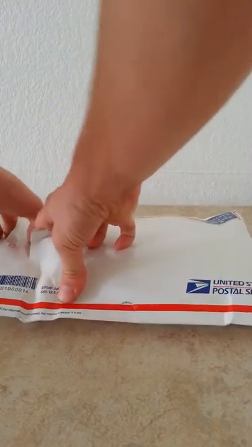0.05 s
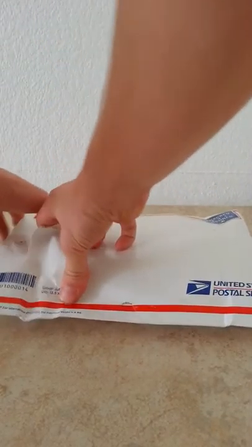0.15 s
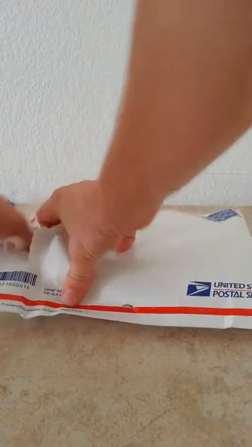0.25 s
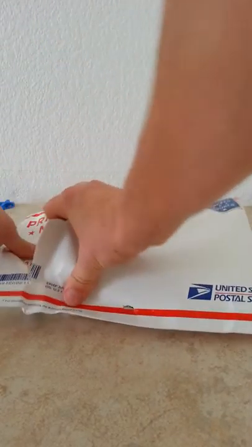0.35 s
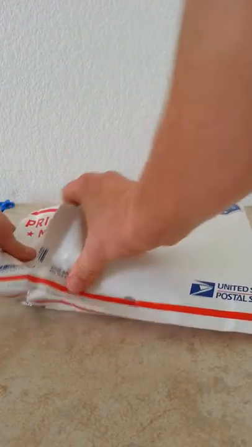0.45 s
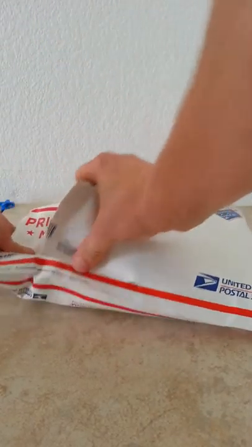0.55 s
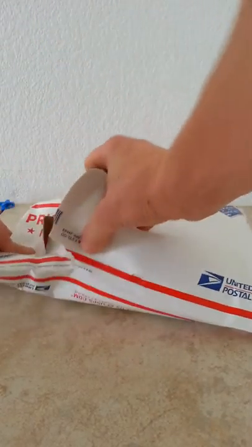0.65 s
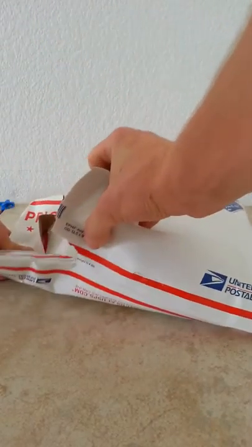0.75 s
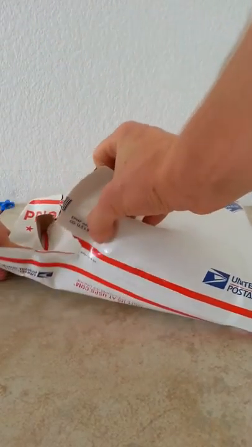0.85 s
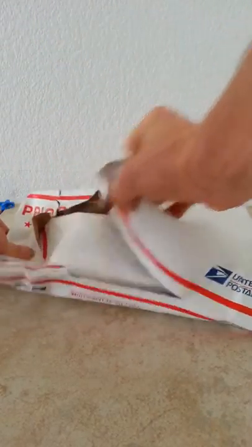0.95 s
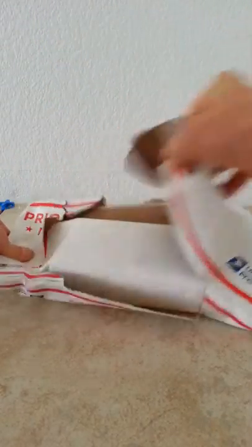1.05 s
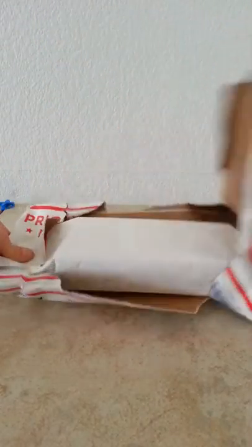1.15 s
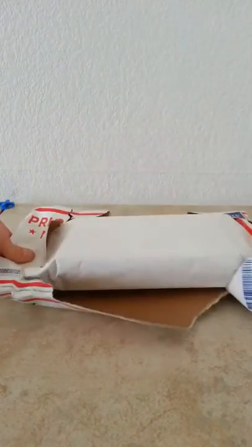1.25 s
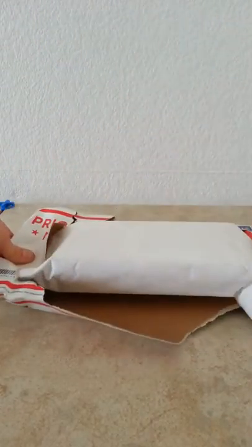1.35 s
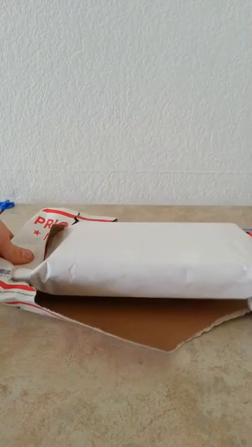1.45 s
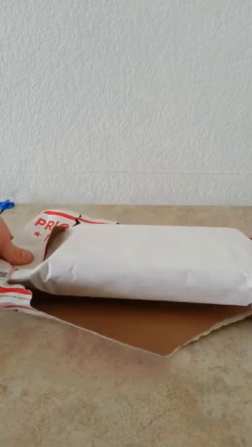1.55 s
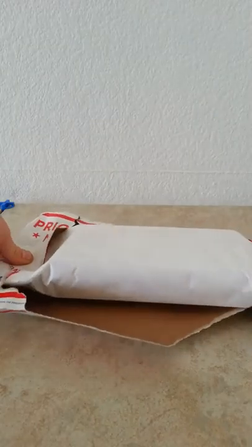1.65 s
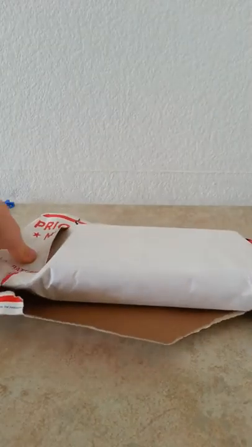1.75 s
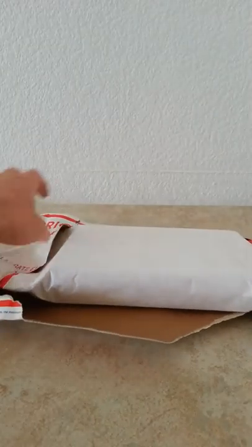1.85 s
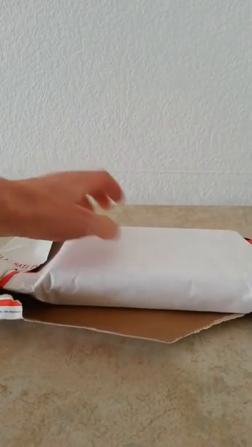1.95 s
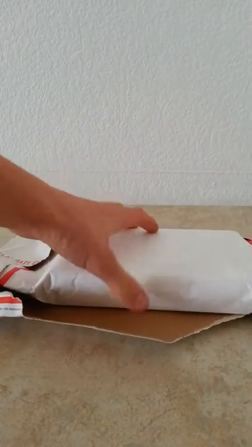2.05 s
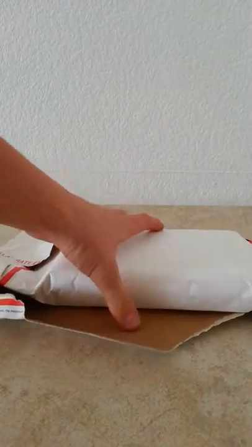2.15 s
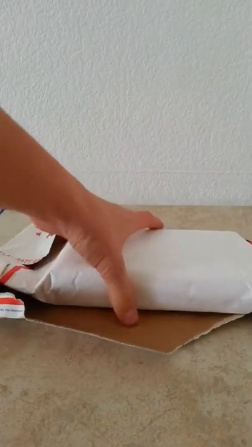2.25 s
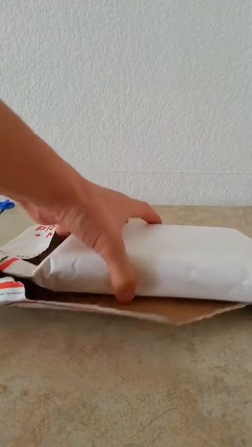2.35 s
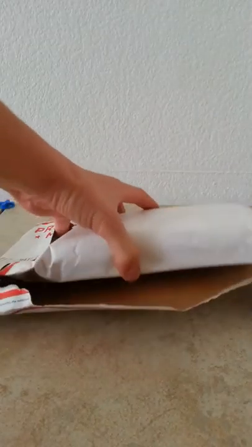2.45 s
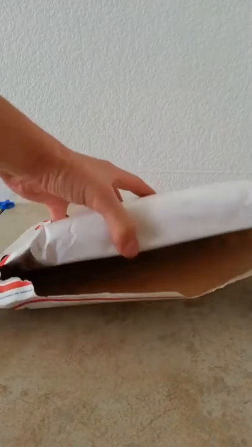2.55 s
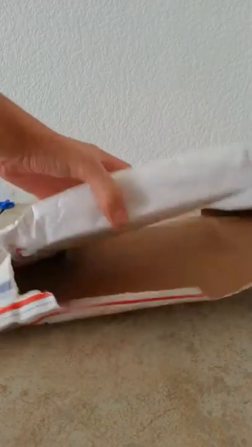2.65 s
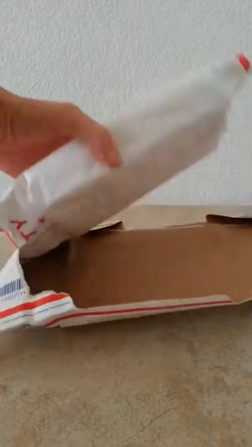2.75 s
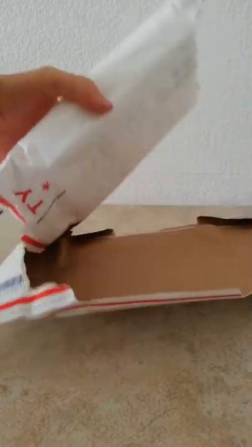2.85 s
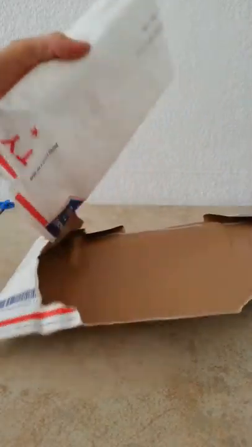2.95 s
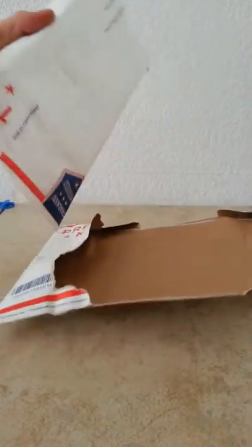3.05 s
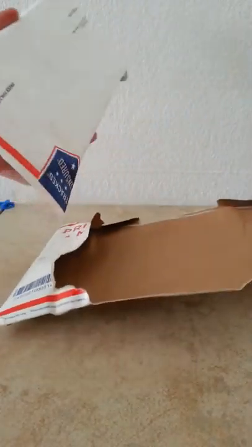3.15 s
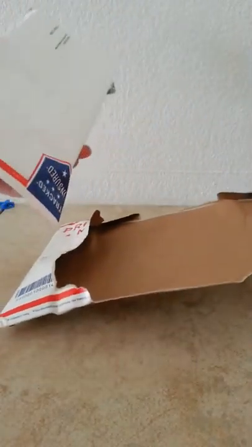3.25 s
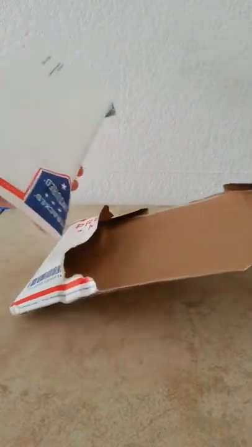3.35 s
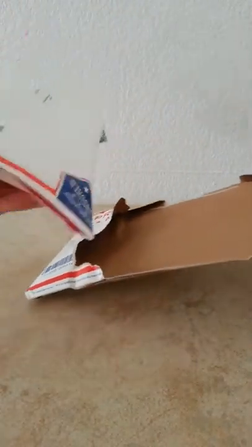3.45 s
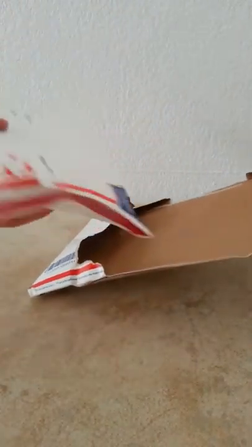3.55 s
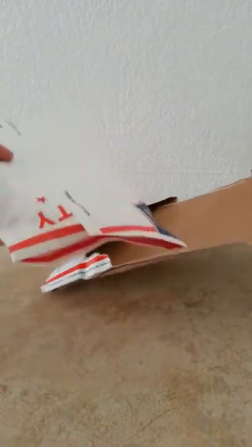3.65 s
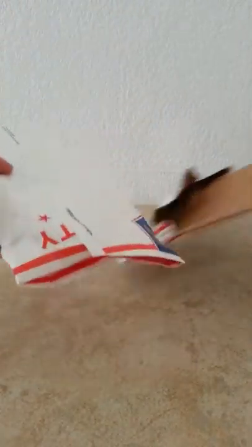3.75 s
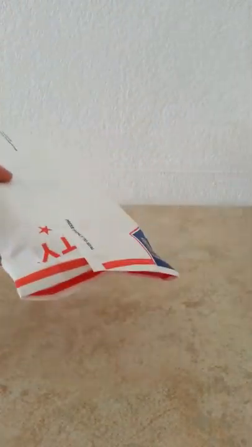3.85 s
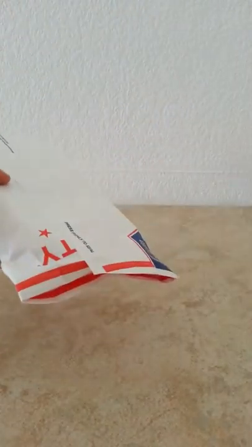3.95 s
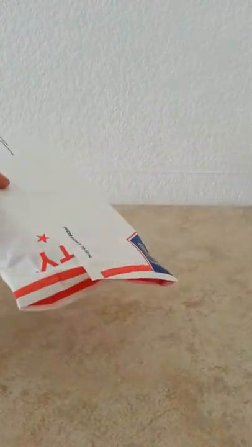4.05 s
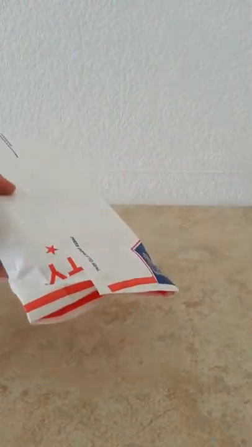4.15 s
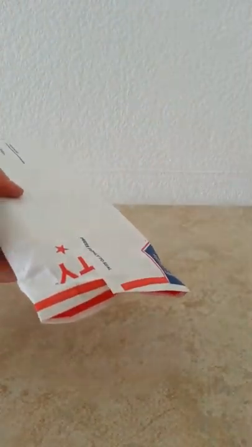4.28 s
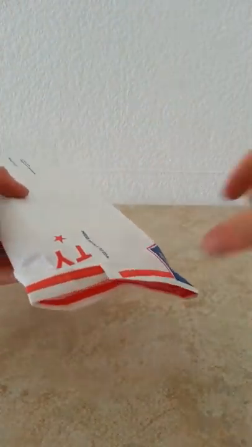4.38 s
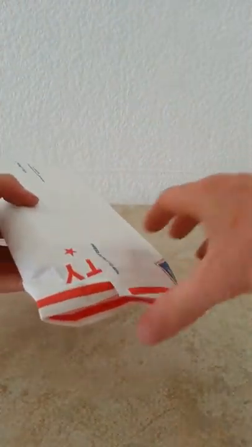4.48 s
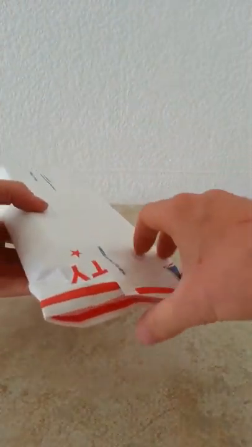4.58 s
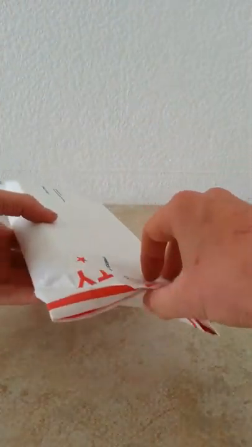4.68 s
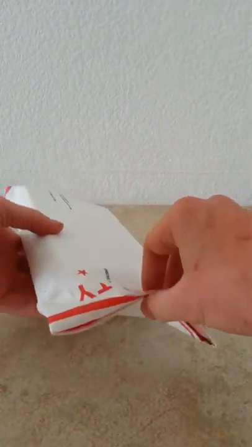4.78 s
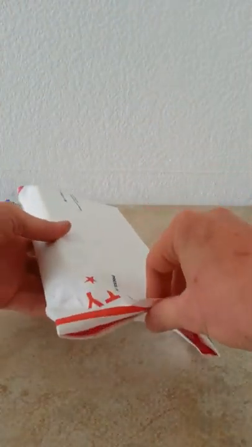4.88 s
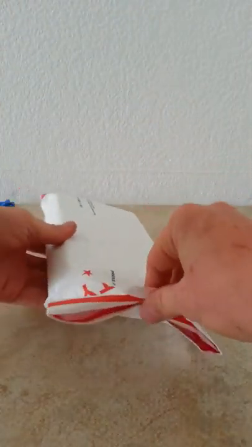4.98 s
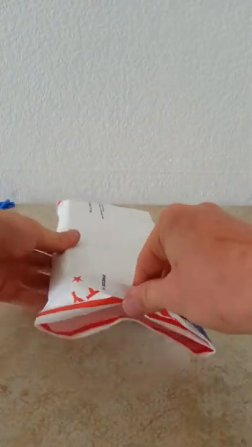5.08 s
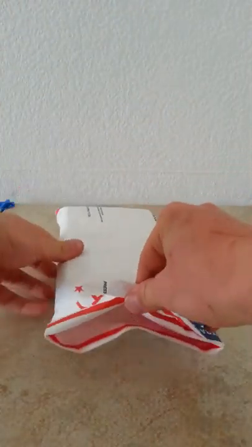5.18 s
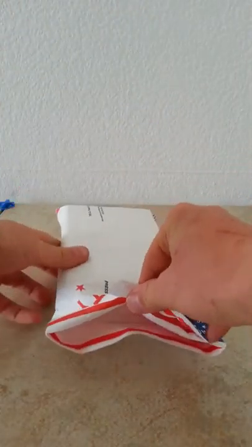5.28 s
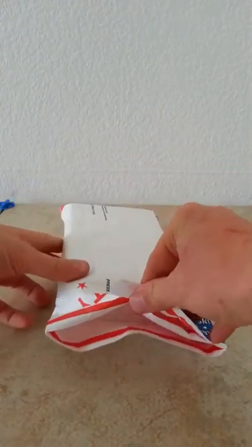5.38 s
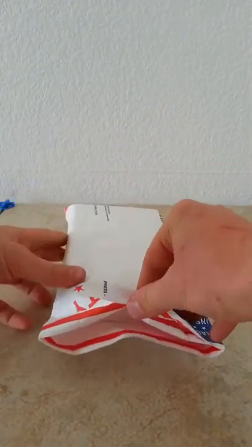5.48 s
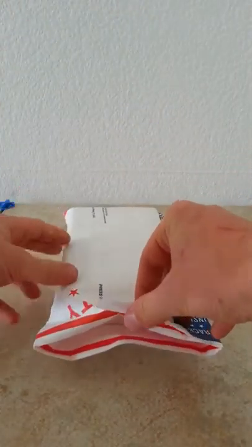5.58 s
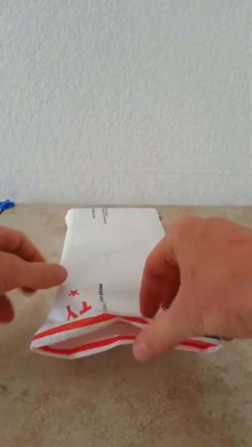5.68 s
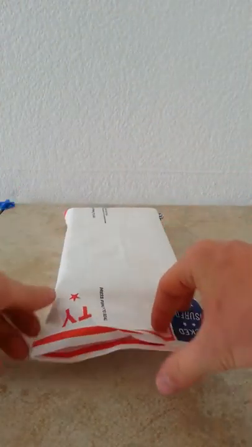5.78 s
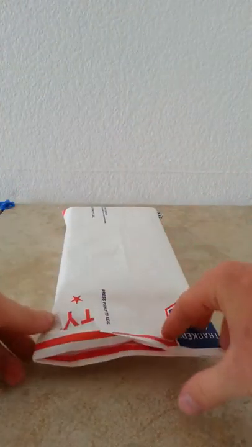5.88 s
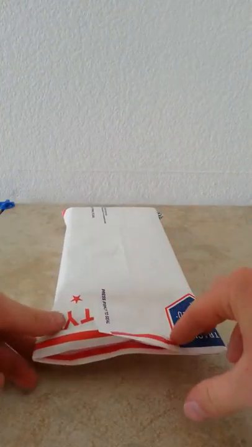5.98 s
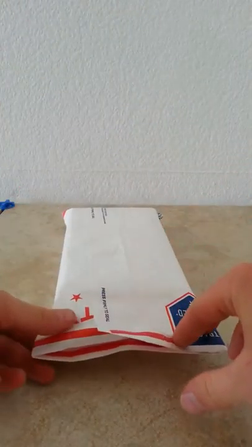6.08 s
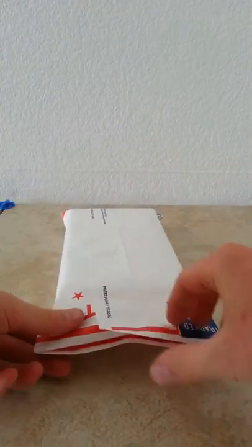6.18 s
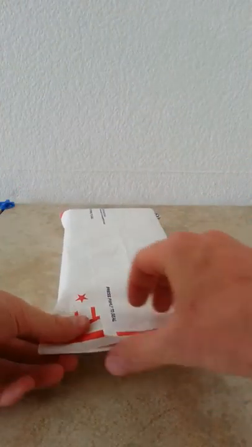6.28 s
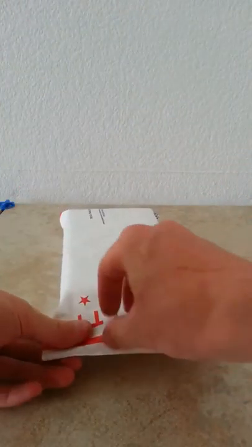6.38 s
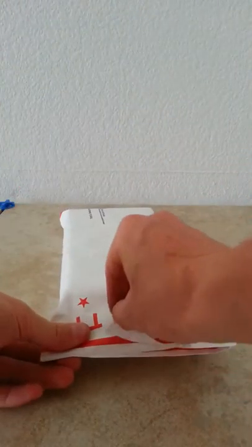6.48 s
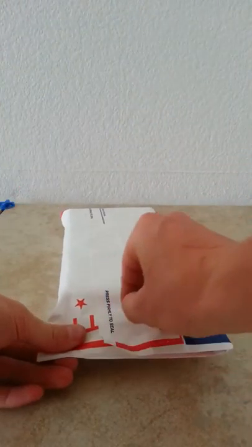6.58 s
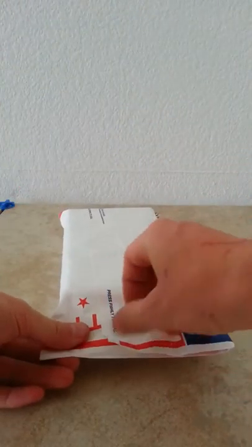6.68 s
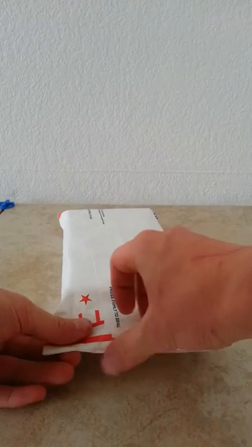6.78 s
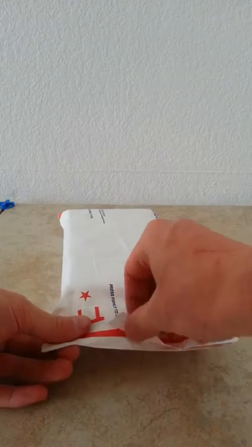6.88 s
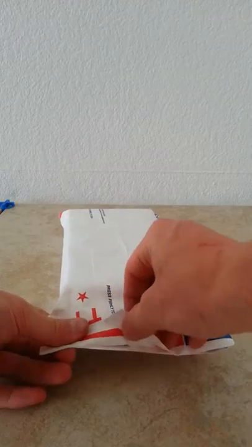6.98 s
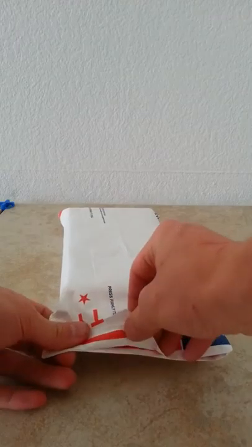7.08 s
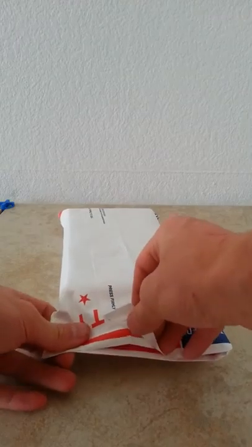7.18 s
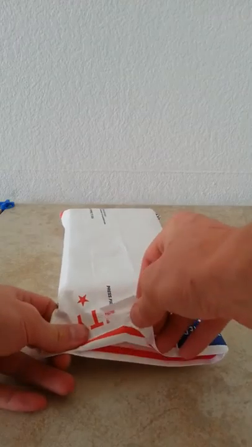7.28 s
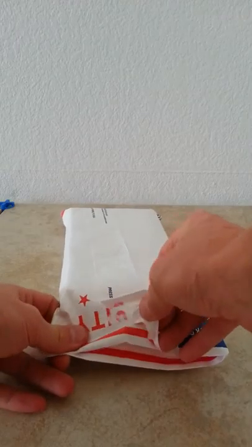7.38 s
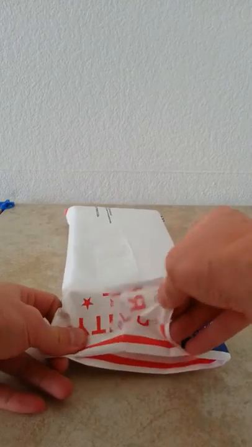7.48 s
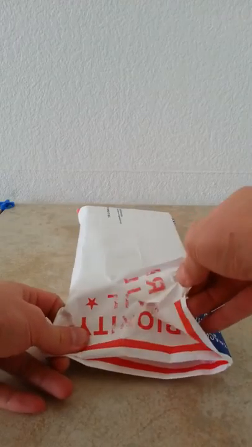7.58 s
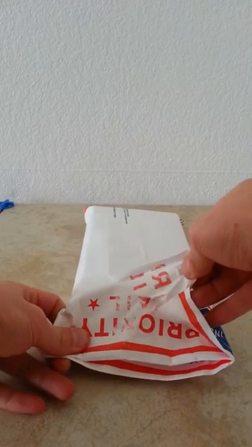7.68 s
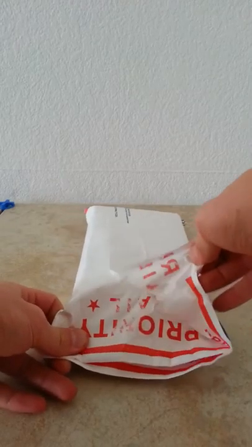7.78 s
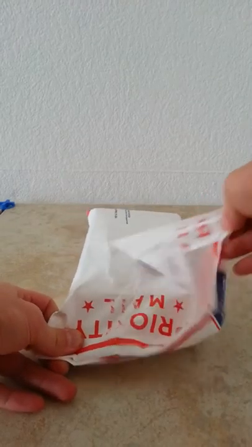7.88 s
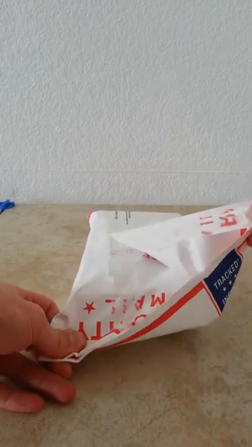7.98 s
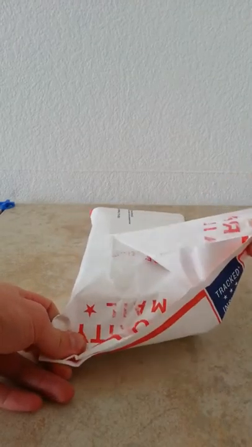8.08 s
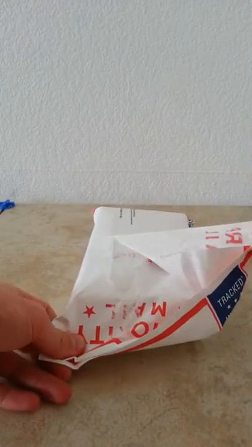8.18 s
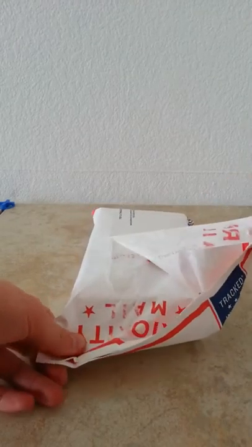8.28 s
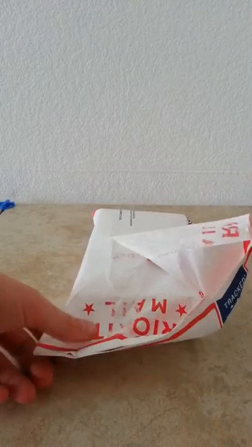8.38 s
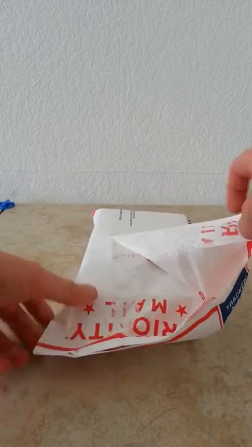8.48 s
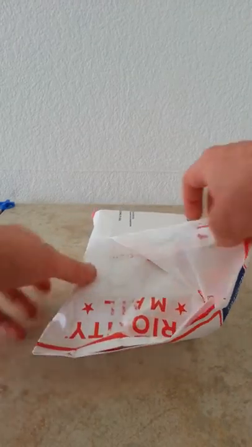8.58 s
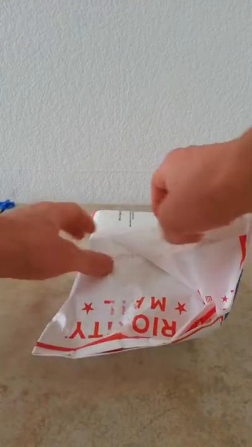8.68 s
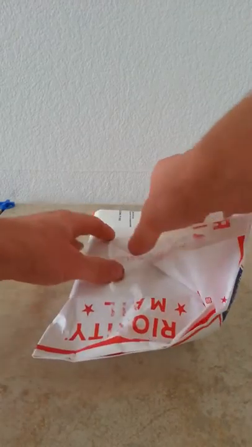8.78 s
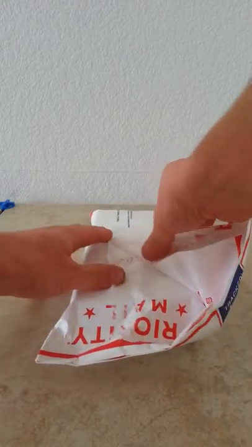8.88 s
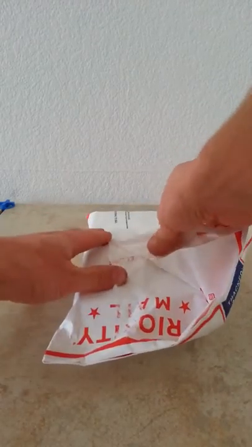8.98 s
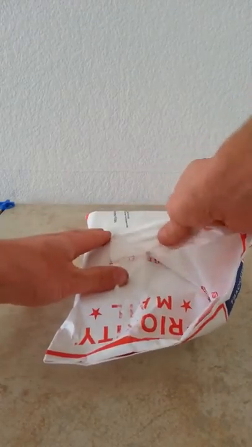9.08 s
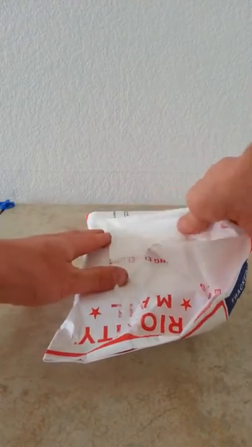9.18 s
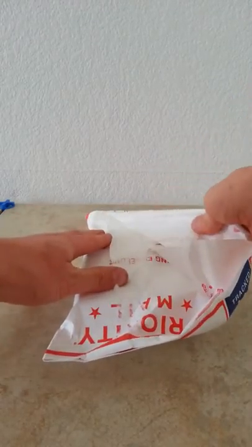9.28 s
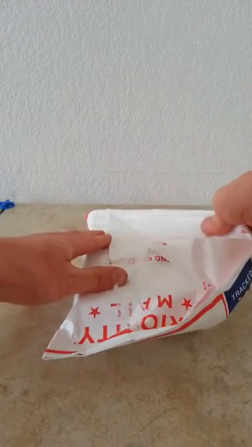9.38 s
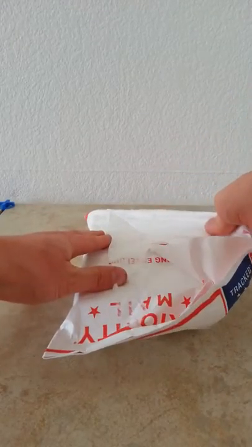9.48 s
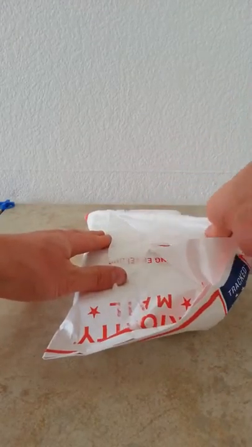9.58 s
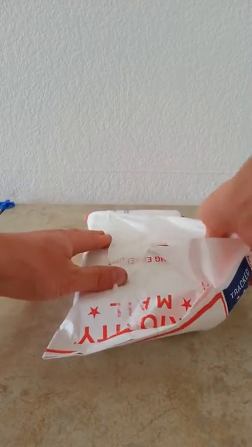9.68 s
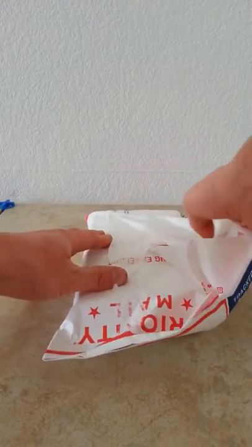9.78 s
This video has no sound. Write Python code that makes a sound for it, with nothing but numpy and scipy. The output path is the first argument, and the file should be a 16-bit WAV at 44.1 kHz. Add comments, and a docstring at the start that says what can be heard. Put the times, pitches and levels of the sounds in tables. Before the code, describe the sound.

A stiff mailer crackles and rumbles under the hands, then tears open in one dense rasp. Softer rustles lead to a plastic-coated envelope slapping flat with a low, short boom. Small snaps and hollow pouch crinkles follow, then the glued seal gives way in jerks and the flap scrapes brightly. Close, live, slightly ringing room; right channel brighter than left.

```python
"""Hands grip and crinkle a card mailer on a countertop, rip it open, lift out a plastic-coated envelope,
drop it flat so that the counter booms, then lift its glued seal, peel the flap open and drag it.
Breaking fibres and buckling creases are shaped noise bursts; snaps and thumps are struck, decaying modes.
A small hard room answers through echo patterns and standing waves; of the two microphone ports,
the left is hollow and dull, the right bright and reached first."""
import sys
import numpy as np
from scipy import signal
from scipy.fft import rfft, irfft, next_fast_len
from scipy.io import wavfile
from scipy.ndimage import uniform_filter1d

SR = 44100
rng = np.random.default_rng(int(sys.argv[2]) if len(sys.argv) > 2 else 0)


def inscribe(sig):
    """Save sig as 16-bit PCM at rate SR to the path in sys.argv[1].

    A 1-D sig is mono; a 2-D sig holds one channel per row.
    Samples are clipped to [-1, 1] before scaling.
    """
    pcm = np.round(np.clip(np.atleast_2d(sig).T, -1, 1) * 32767)
    wavfile.write(sys.argv[1], SR, pcm.astype(np.int16))


N = 433944  # length in samples

# radiation of breaking fibres: f/Hz [Hz], relative level/dB [dB]
FIBRE_SPECTRUM = [(1500, -50), (2800, -3.5), (4000, 2), (7000, 2), (10000, -1.5), (15000, -3)]
# radiation of the bending sheet: f/Hz [Hz], relative level/dB [dB]
SHEET_SPECTRUM = [(400, -33.5), (750, -1.5), (1000, -1.5), (1400, 0.5), (2100, 1.5), (3300, -5),
                  (4600, -4.5), (9000, -45)]
POUCH_RING_HZ = 698  # resonance of the air in the light pouch


def gain_of(db):
    """Level to amplitude: 20 dB is a factor of ten."""
    return 10 ** (np.asarray(db) / 20)


def evened(x):
    """Normalisation to unit rms, so that a level can be set afterwards."""
    return x / np.sqrt(np.mean(x ** 2) + 1e-20)


def read(points, hz):
    """Interpolation of a spectrum table on a logarithmic frequency axis."""
    f, value = np.transpose(points)
    return np.interp(np.log(hz + 1), np.log(f + 1), value)


def add(mix, s, sound):
    """Superposition: lays a sound into the mix at time s."""
    part = mix[max(round(s * SR), 0):][:len(sound)]
    part += sound[:len(part)]


def coloured(x, points, size=2048):
    """Minimum-phase filtering: the phase follows from the log gain by the Hilbert transform."""
    log_gain = np.log(gain_of(read(points, abs(np.fft.fftfreq(size, 1 / SR)))))
    response = np.exp(np.conj(signal.hilbert(log_gain)))
    taps = np.fft.ifft(response).real[:size // 2]
    return signal.oaconvolve(x, taps)[:len(x)]


def smoothed(x, seconds):
    """Triangular running mean: two rectangular means in cascade."""
    width = max(int(seconds * SR), 1)
    return uniform_filter1d(uniform_filter1d(x, width), width)


def steadied(x, seconds):
    """Short-time normalisation to unit rms; flicker quicker than the stretch remains."""
    return x / np.sqrt(abs(smoothed(x ** 2, seconds)) + 1e-9)


def ringing(hz, decay_s, size=2048):
    """One damped mode: a sine under exponential decay, unit rms."""
    t = np.arange(size) / SR
    return evened(np.sin(2 * np.pi * hz * t) * np.exp(-t / decay_s))


def flutter(decay_s, size=2048):
    """Impulsive excitation of many modes: noise under exponential decay, unit energy."""
    shiver = rng.standard_normal(size) * np.exp(-np.arange(size) / SR / decay_s)
    return shiver / np.linalg.norm(shiver)


def weight_at(s):
    """Mass loading: how heavy the handled thing is at the times s."""
    # what is in the hands: t/s [s], weight [0 = light hollow pouch, 1 = card on the counter]
    weight_curve = [(0, .8), (1.7, .75), (3.4, .65), (3.7, .1), (3.93, .1), (4.07, .95), (4.7, .8),
                    (5, .18), (5.8, .08), (6.45, .5), (6.7, .2), (7.3, .25), (7.8, .08), (7.95, .45),
                    (8.3, .35), (8.55, .6), (9.05, .3), (9.84, .36)]
    return np.clip(np.interp(s, *np.transpose(weight_curve)), 0, 1)


def walls(push, weight):
    """Panel radiation: heavy card on the counter rumbles; the light pouch, held open, sounds hollow."""
    # heavy card: f/Hz [Hz], relative level/dB [dB]
    panel_spectrum = [(25, -67), (60, -13.5), (110, -8.5), (160, -5.5), (280, 0), (420, 0), (620, -1),
                      (850, -1.5), (1300, -13.5), (3000, -77)]
    # light pouch: f/Hz [Hz], relative level/dB [dB]
    pouch_spectrum = [(40, -62), (130, -17), (290, -3), (450, -4), (660, -1.5), (850, -0.5), (1200, -10.5),
                      (3000, -47)]
    card = evened(coloured(push, panel_spectrum))
    pouch = evened(coloured(push, pouch_spectrum))
    return weight * card + (1 - weight) * pouch


def followed(curve, t):
    """Linear interpolation in level: fizz and rumble gains along a curve, one row each."""
    s, *levels = np.transpose(curve)
    return gain_of([np.interp(t, s, level) for level in levels])


def effort():
    """Incoherent sources add in power: hold, strokes and pulls give fizz dB, rumble dB and tearing 0-1."""
    # hands keep hold between strokes: t/s [s], fibre fizz level/dB [dB], panel rumble level/dB [dB]
    hold = [(0, -35.5, -29.5), (1.8, -39, -34.5), (2.9, -40.5, -38), (3.25, -50.5, -44), (3.9, -46.5, -55),
            (4.35, -57, -32.5), (4.85, -42.5, -49), (5.55, -43.5, -46), (5.8, -54.5, -42), (6.14, -66, -77),
            (6.28, -74, -67), (6.42, -47.5, -42), (6.7, -50, -44), (6.88, -66, -78), (6.96, -44, -49),
            (8.4, -50, -38.5), (8.78, -57, -54), (8.92, -51, -53), (9.84, -37.5, -44.5)]
    # grips, bends and slides: start t/s [s], length [s], fizz level/dB [dB], rumble level/dB [dB]
    strokes = [(0, 0.099, -29, -29.5), (0.117, 0.025, -26.5, -26), (0.184, 0.11, -59, -30.5),
               (0.32, 0.12, -26, -24.5), (0.468, 0.25, -33, -26.5), (0.64, 0.13, -39, -22),
               (0.795, 0.066, -34.5, -32), (1.945, 0.016, -36.5, -30.5), (2.313, 0.15, -34.5, -35.5),
               (2.544, 0.036, -29.5, -37), (2.697, 0.15, -28.5, -28), (2.918, 0.025, -32, -35),
               (3.012, 0.024, -30.5, -50), (3.38, 0.2, -46, -63), (3.63, 0.12, -43, -46.5),
               (3.752, 0.023, -56, -23), (3.884, 0.04, -38.5, -38), (3.971, 0.062, -26, -16.5),
               (4.073, 0.051, -24, -14), (4.126, 0.12, -38.5, -25), (4.383, 0.053, -34, -34),
               (4.566, 0.14, -44.5, -31), (4.862, 0.066, -39.5, -43), (5.097, 0.039, -37, -52),
               (5.173, 0.079, -34, -33.5), (5.385, 0.047, -53, -34), (5.543, 0.1, -38, -38),
               (5.87, 0.034, -39, -47), (6.023, 0.043, -37, -47.5), (6.18, 0.071, -48.5, -67),
               (6.298, 0.015, -43.5, -53), (6.509, 0.14, -40.5, -54), (7.177, 0.043, -30, -59),
               (8.518, 0.11, -43.5, -41.5), (8.623, 0.069, -36, -63), (8.777, 0.093, -45, -43),
               (8.949, 0.028, -34, -36), (9.61, 0.15, -46, -38)]
    # long pulls that tear something open: t/s [s], fizz level/dB [dB], rumble level/dB [dB]
    rip = [(.91, -62, -24), (.97, -28, -35), (.99, -24.5, -16), (1.04, -26, -12), (1.08, -38, -15.5),
           (1.12, -26, -14), (1.23, -22, -16.5), (1.58, -25.5, -25), (1.66, -23.5, -27.5), (1.75, -52, -30)]
    # the seal lifts: t/s [s], fizz level/dB [dB], rumble level/dB [dB]
    seal_lift = [(7.25, -39, -70), (7.31, -22.5, -37), (7.42, -27, -41), (7.47, -34.5, -35),
                 (7.54, -21, -32), (7.6, -27, -25.5), (7.66, -26.5, -34), (7.695, -22, -27),
                 (7.75, -24, -42)]
    # the flap peels: t/s [s], fizz level/dB [dB], rumble level/dB [dB]
    flap_peel = [(7.75, -27, -53), (7.84, -23.5, -29), (7.895, -34, -40), (7.93, -22, -23.5),
                 (8.06, -24, -24.5), (8.38, -53, -44)]
    # the flap drags: t/s [s], fizz level/dB [dB], rumble level/dB [dB]
    flap_drag = [(9.035, -27.5, -25), (9.065, -31.5, -51), (9.095, -18.5, -37), (9.125, -30, -41),
                 (9.15, -22, -38), (9.21, -25, -36), (9.28, -20, -32), (9.343, -36.5, -30.5),
                 (9.36, -22.5, -34.5), (9.435, -20, -23), (9.465, -26.5, -30.5), (9.575, -27, -26),
                 (9.62, -40, -40)]
    attack_s, sag_db_per_s, release_db_per_s = 0.015, 3, 290
    pull_edge_s = .004
    crinkling = .3  # density of fibre breaks (0-1) outside the pulls
    # card rasps evenly, glue lets go in fits
    pulls = ((rip, .85), (seal_lift, .35), (flap_peel, .6), (flap_drag, .65))

    t, age = np.arange(N) / SR, np.arange(SR // 2) / SR
    handling = followed(hold, t) ** 2
    for start, length, *levels in strokes:
        fall_db = sag_db_per_s * age + release_db_per_s * np.maximum(age - length, 0)
        shape = np.minimum(age / attack_s, 1) * gain_of(-fall_db)
        for power, db in zip(handling, levels):
            add(power, start, (gain_of(db) * shape) ** 2)

    total, tearing = handling, crinkling * handling[0]
    for pull, density in pulls:
        inside_s = np.minimum(t - pull[0][0], pull[-1][0] - t)
        edges = np.clip(inside_s / pull_edge_s + 1, 0, 1)
        power = (followed(pull, t) * edges) ** 2
        total, tearing = total + power, tearing + density * power[0]
    fizz_db, rumble_db = 10 * np.log10(total)
    return fizz_db, rumble_db, np.clip(tearing / total[0], 0, 1)


def crackle(per_s, spread_db, decay_s):
    """Random point process: tiny breaks of uneven size, each shaking a facet of the sheet."""
    sizes = gain_of(spread_db * np.minimum(rng.standard_normal(N), 2.4))
    at = np.flatnonzero(rng.random(N) < per_s / SR)
    facets = [flutter(decay_s, size=512) for k in range(2048)]
    facet, out = rng.integers(0, len(facets), N), np.zeros(N)
    for i in at:
        add(out, i / SR, sizes[i] * facets[facet[i]])
    return evened(out)


def paper(fizz_db, rumble_db, tearing):
    """Crackling noise: breaks clump, sparse in crinkling and dense in a tear, over the hiss of sliding."""
    rustle_follows, rustle_base_db = 0.47, -5  # rustle lies between fizz (0) and rumble (1)
    card_rustle_db = -1.5  # rustle change from pouch to card
    hollow_db, pouch_damped_s = -4, 0.0062  # rubbing rings the pouch air, damped by the hands

    weight = weight_at(np.arange(N) / SR)
    between_db = fizz_db + rustle_follows * (rumble_db - fizz_db)
    rustle_db = between_db + rustle_base_db + card_rustle_db * (weight - .5)

    grip = evened(smoothed(rng.standard_normal(N), 0.0066))
    clumps = gain_of(grip * (2.5 - 0.97 * tearing))
    fibre_crackle = crackle(330 * 9. ** tearing, spread_db=2.5, decay_s=0.00076)
    breaks = clumps * (fibre_crackle + 0.6 * rng.standard_normal(N))
    tug_crackle = crackle(220 * 2.2 ** tearing, spread_db=6.0, decay_s=0.0024)
    tugs = gain_of(2.2 * grip) * (tug_crackle + 0.39 * rng.standard_normal(N))
    buckle_crackle = crackle(430 * 9. ** tearing, spread_db=1.5, decay_s=0.001)
    buckles = clumps * (buckle_crackle + 0.44 * rng.standard_normal(N))

    fizz = steadied(coloured(breaks, FIBRE_SPECTRUM), 0.14) * gain_of(fizz_db)
    rustle = steadied(coloured(buckles, SHEET_SPECTRUM), 0.062) * gain_of(rustle_db)
    rumble = steadied(walls(tugs, weight), 0.037) * gain_of(rumble_db - 6.5)
    cavity = signal.oaconvolve(tugs, ringing(POUCH_RING_HZ, pouch_damped_s))[:N]
    hollow = steadied(cavity, 0.041) * (1 - weight) ** 5 * gain_of(rumble_db + hollow_db)
    return fizz + rustle + rumble + hollow


def moving(x, echo, size):
    """Time-varying convolution: each overlapping stretch meets a fresh echo pattern as hands and paper move."""
    window = np.sin(np.pi * np.arange(2 * size) / (2 * size))
    padded = np.pad(x, (size, 2 * size))
    out = np.zeros((2, len(padded)))  # one row a port
    for i in range(0, N + size, size):
        stretch = padded[i:i + 2 * size] * window
        for port, sound in zip(out, signal.fftconvolve([stretch], echo(), axes=1)):
            add(port, i / SR, sound)
    return out[:, size:size + N]


def near_echoes(size=1024):
    """Early reflections off counter and wall: decaying noise taps, unit energy a port."""
    t = np.arange(size) / SR
    taps = rng.standard_normal((2, size)) * (t > .0005) * np.exp(-t / 0.0029)
    return taps / np.linalg.norm(taps, axis=1, keepdims=True)


def tail():
    """Frequency-dependent absorption: the late tail dies faster in the treble; unit energy a port."""
    # reverberation of the room: f/Hz [Hz], 60 dB decay time t60/s [s]
    decay_times = [(150, 0.4), (500, 0.71), (1500, 1), (4000, 1), (7000, 0.65), (14000, 0.36)]
    t = np.arange(SR * 3 // 5) / SR
    noise = rng.standard_normal((2, len(t))) * (1 - np.exp(-t / 0.0027))
    hz, when, z = signal.stft(noise, SR, nperseg=256)
    decay = gain_of(-60 * when / read(decay_times, hz)[:, None])
    taps = signal.istft(z * decay, SR, nperseg=256)[1]
    return taps / np.linalg.norm(taps, axis=1, keepdims=True)


def standing_waves(x):
    """Room modes: a few pitches linger between the walls."""
    # modes between the walls: f/Hz [Hz], level/dB at the peak [dB]
    modes = [(302.5, -2), (325, 0), (388, -2), (484.5, -0.5), (530, -1), (608, 0)]
    t60_s = 0.63
    t, decay_s = np.arange(SR) / SR, t60_s / np.log(1000)
    ring = sum(gain_of(db) * np.sin(2 * np.pi * hz * t) for hz, db in modes) * np.exp(-t / decay_s)
    return signal.oaconvolve(x, 2 * ring / (decay_s * SR))[:N]


def room(x):
    """Reverberation: near echoes, tail and standing waves, partly coherent between the two ports."""
    # coherence of the echoes at the two ports: f/Hz [Hz], likeness [0-1]
    likeness = [(100, 0.5), (250, 0.84), (500, 1), (1000, 0), (2000, 0), (14000, 0.22)]
    near_db, tail_db = -3.5, -8.5
    # long waves merge with the direct sound
    short_waves = signal.lfilter(*signal.butter(2, 900, "high", fs=SR), x)
    near = gain_of(near_db) * moving(short_waves, near_echoes, size=1024)
    wet = near + gain_of(tail_db) * moving(x, tail, size=8192)
    size = next_fast_len(N)
    first, second = rfft(wet, size)
    same = np.clip(read(likeness, np.fft.rfftfreq(size, 1 / SR)), 0, 1)
    blended = same * first + np.sqrt(1 - same ** 2) * second
    return irfft([first, blended], size)[:, :N] + standing_waves(x)


def snaps(rows):
    """Snap-through buckling: a crease creaks under strain, then flips with a crack, a knock and a push."""
    # radiation of the flipping crease: f/Hz [Hz], relative level/dB [dB]
    crease_spectrum = [(1500, -46), (2800, -16), (4000, 0.5), (7000, -0.5), (10000, -1.5), (15000, -8.5)]
    knock_share_db, push_share_db = -8, -11.5  # the body of a snap, shared by sheet and walls
    pouch_ring_s, pouch_ring_db = 0.0086, -26  # pouch air rings after a snap
    out = np.zeros(N)
    for s, crack_db, crack_hz, body_db, knock_hz in rows:
        shiver = flutter(.0013)
        sheet_ring = .9 * ringing(knock_hz, .0014)
        crease_ring = .75 * ringing(crack_hz, .0005)
        crack = evened(evened(coloured(shiver, crease_spectrum)) + crease_ring) * gain_of(crack_db - 14.5)
        sheet_shiver = evened(coloured(shiver + .5 * flutter(0.003), SHEET_SPECTRUM))
        knock = evened(sheet_shiver + sheet_ring) * gain_of(body_db + knock_share_db)
        push = evened(walls(flutter(0.003), weight_at(s))) * gain_of(body_db + push_share_db)
        pouch_ring = ringing(POUCH_RING_HZ, pouch_ring_s) * gain_of(body_db + pouch_ring_db)
        hollow = (1 - weight_at(s)) * pouch_ring
        add(out, s + .0005, crack + knock + push + hollow)

        strain = flutter(0.0079, size=1024)[::-1]  # reversed, so it grows
        fibre_creak = evened(coloured(strain, FIBRE_SPECTRUM)) * gain_of(crack_db - 21.0)
        sheet_creak = evened(coloured(strain, SHEET_SPECTRUM)) * gain_of(body_db - 13.5)
        creak = fibre_creak + sheet_creak
        add(out, s - len(creak) / SR, rng.random() * creak)  # some creases give almost no warning
    return out


def lesser_snaps(fizz_db, rumble_db, tearing):
    """Random small instabilities: rows for creases as strong as the work; a clean tear has few."""
    most_per_s, crack_db, body_db, spread_db = 9, 5.5, -3.5, 4  # levels relative to the work
    crack_hz, crack_spread, knock_hz = 6690, 0.059, 2280  # pitches are scattered about these
    chance, pitch = rng.random(N), rng.uniform(-0.82, 0.53, N)  # pitch in octaves
    size, stiffness = rng.standard_normal((2, N))
    rows = []
    for i in np.flatnonzero(chance < (1 - tearing) * most_per_s / SR):
        size_db = spread_db * size[i]
        work_db = (fizz_db[i] + rumble_db[i]) / 2
        rows.append((i / SR,
                     fizz_db[i] + crack_db + size_db, crack_hz * np.exp(crack_spread * stiffness[i]),
                     work_db + body_db + size_db, knock_hz * 2 ** pitch[i]))
    return rows


def thumps():
    """Damped low modes: a few swings of the envelope wall with a dull shudder."""
    # the envelope flexes or meets the counter: t/s [s], relative level/dB [dB], f/Hz [Hz]
    blows = [(0.247, -15, 280), (0.753, -13, 310), (0.927, -7, 496), (0.956, -7, 275), (0.984, -11.5, 533),
             (1.142, -13, 477), (1.188, -7, 408), (2.344, -24.5, 540), (2.42, -24.5, 257), (2.5, -28, 400),
             (2.693, -18, 446), (2.746, -23.5, 238), (3.032, -30, 310), (3.15, -32, 296), (3.318, -31, 405),
             (3.365, -31.5, 540), (3.677, -30, 640), (4.07, -8, 196), (4.077, -7.5, 165), (4.128, -13, 165),
             (4.226, -19.5, 200), (4.598, -22, 216), (6.483, -30, 332), (6.902, -36, 258),
             (6.949, -27.5, 570), (7.475, -25, 596), (7.71, -15.5, 260), (7.726, -24, 196),
             (7.874, -16.5, 510), (7.909, -18, 356), (7.92, -22, 400), (8.547, -26, 333),
             (8.81, -26.5, 257), (9.172, -15, 333)]
    out = np.zeros(N)
    for s, db, hz in blows:
        shudder = walls(flutter(0.0081), weight_at(s))
        t = np.arange(len(shudder)) / SR
        motion = np.sin(2 * np.pi * hz * t) * t * np.exp(-t * hz / 0.84)
        swing = np.gradient(motion)  # pressure follows the change of motion
        add(out, s, gain_of(db - 14.0) * evened(evened(swing) + 0.66 * evened(shudder)))
    return out


def tear_bursts():
    """Brittle failure: card or glued seal gives way in dense bursts; microphone overload adds a low jolt."""
    # card or glued seal gives way: t/s [s], burst relative level/dB [dB], overload jolt level/dB [dB]
    bursts = [(0.9754, -17, -44), (7.7101, -16, -32), (7.7259, -22, -31.5), (7.8623, -17, -29),
              (7.8735, -15, -37.5)]
    jolt_s = 0.00023  # length of the overload jolt
    out, u = np.zeros(N), np.arange(2048) / SR / jolt_s
    jolt = evened((1 - u) * np.exp(-u))
    for s, burst_db, jolt_db in bursts:
        burst = flutter(.0034)
        fibres = evened(coloured(burst, FIBRE_SPECTRUM))
        sheet = evened(coloured(burst, SHEET_SPECTRUM))
        add(out, s, gain_of(burst_db) * (fibres + 0.35 * sheet))
        add(out, s, gain_of(jolt_db) * jolt)
    return out


def landing():
    """Impact on an air cushion: the flat fall pushes air out and sets the counter's damped modes booming."""
    # modes of counter and trapped air: f/Hz [Hz], relative level/dB [dB], decay time t60/s [s]
    boom_modes = [(72, -8, 0.27), (110, -2, 0.22), (142, 3, 0.42), (193, -3, 0.196)]
    landing_s, landing_db = 4.073, -27
    t, out = np.arange(SR // 2) / SR, np.zeros(N)
    boom = sum(gain_of(db - 60 * t / t60) * np.sin(2 * np.pi * hz * t) for hz, db, t60 in boom_modes)
    add(out, landing_s, gain_of(landing_db) * boom * (1 - np.exp(-t / 0.0034)))
    return out


def scene():
    """Path difference: the right port hears the paper first; the left faces away and hears more room."""
    # creases: t/s [s], crack level/dB [dB], crack f/Hz [Hz], body level/dB [dB], knock f/Hz [Hz]; levels relative
    creases = [(.0283, -18, 6900, -25, 1820), (.0598, -26, 6100, -21, 1930),
               (.1301, -23, 6800, -19.5, 2480), (.1451, -20, 6600, -27.5, 2190),
               (.2508, -32, 6400, -23.5, 1090), (.3356, -17, 6200, -27, 3100),
               (.3594, -14, 6100, -32, 2940), (.3894, -10, 6370, -29, 2800),
               (.4199, -16, 6470, -24.5, 1760), (.4968, -18, 6550, -31, 3050),
               (.5881, -16, 6900, -29, 3120), (.6054, -10, 6740, -28, 3020), (.6444, -13, 7400, -34, 2800),
               (.6639, -16, 7200, -30, 2780), (.6938, -15, 7300, -24, 3160), (.7173, -16, 7280, -42, 1900),
               (.8315, -20, 6370, -30, 1800), (.876, -22.5, 6800, -43, 2200), (.9123, -17, 7100, -35, 1000),
               (1.0424, -23, 6600, -16.5, 2360), (1.0713, -19, 6440, -20.5, 1930),
               (1.1034, -13, 6600, -34, 1850), (1.9844, -33, 7000, -32.5, 2200),
               (2.5486, -15, 6150, -25.5, 2400), (2.6948, -18.5, 6300, -31.5, 2180),
               (2.7482, -13, 5950, -22, 2910), (2.9487, -22.5, 6400, -32, 2240),
               (3.038, -22.5, 6900, -30, 3650), (3.3697, -33.5, 6300, -39.5, 2210),
               (3.58, -44, 6600, -34.5, 2060), (3.695, -28.5, 6300, -29, 1820),
               (3.7594, -17, 6400, -31, 920), (3.9774, -15.5, 6800, -23, 1790),
               (4.0133, -19, 6200, -21.5, 1880), (4.0672, -19, 6700, -19.5, 4030),
               (4.177, -24, 6070, -32, 1010), (4.3595, -31.5, 7750, -42, 1200),
               (4.3924, -20, 6240, -24, 1720), (4.4558, -31, 6300, -25, 2170),
               (4.5645, -28, 6600, -33, 2300), (4.6024, -22, 6550, -27, 1750),
               (4.8933, -31, 6500, -37, 2090), (5.016, -24, 5630, -32.5, 1530),
               (5.0833, -12.5, 7460, -27, 3380), (5.1831, -18, 6000, -34, 4390),
               (5.3971, -13, 5440, -28, 2230), (5.5772, -22.5, 6500, -32.5, 3880),
               (5.6057, -15, 6550, -32, 2140), (5.7856, -38, 6500, -38, 2360),
               (5.8252, -29.5, 6700, -35, 2290), (5.906, -27, 7140, -50, 2200),
               (6.0117, -33, 7300, -46, 2230), (6.0477, -32, 6660, -45, 2080),
               (6.3622, -40, 6700, -33, 1110), (6.3889, -35, 6500, -31, 2020),
               (6.4243, -21, 7000, -37, 3130), (6.4577, -28.5, 7140, -38, 1380),
               (6.54, -28.5, 6600, -55, 2060), (6.6218, -17, 6800, -26.5, 1060),
               (6.9237, -19, 6400, -35.5, 1320), (6.9522, -42, 6600, -32, 1850),
               (6.9785, -27.5, 7100, -29.5, 1970), (7, -22, 7500, -26.5, 1920),
               (7.07, -30, 7300, -50, 2000), (7.1122, -18, 6750, -33, 3650),
               (7.1781, -19.5, 6300, -26.5, 1990), (7.199, -14.5, 7400, -62, 1930),
               (7.237, -22, 7200, -61, 3780), (7.2579, -14, 7360, -67, 1990),
               (7.2888, -20, 6300, -56, 2100), (7.3205, -19, 7000, -29.5, 2000),
               (7.3297, -30, 5640, -36, 2000), (7.4385, -18, 6700, -41, 2120),
               (7.452, -20, 6660, -29.5, 1300), (7.4799, -17.5, 7440, -31, 4140),
               (7.4989, -21, 6560, -34, 3710), (7.631, -19, 6800, -36, 2110), (7.656, -20, 6900, -35, 2100),
               (7.7742, -19, 6700, -30, 2130), (7.888, -29, 7100, -43, 2150), (7.924, -27, 6900, -26, 2150),
               (8.2242, -17.5, 6870, -52, 2030), (8.3644, -29, 6900, -38, 1990),
               (8.4437, -20, 7440, -35.5, 2040), (8.548, -25, 5940, -41, 2640),
               (8.707, -24, 6900, -41, 2300), (8.8243, -24, 6540, -33.5, 2200),
               (9.0074, -18, 6700, -24, 2500), (9.0528, -24, 6700, -26.5, 2360),
               (9.07, -23, 6600, -32, 2300), (9.313, -24, 7160, -28, 2510), (9.3521, -16, 6800, -28, 4170),
               (9.5327, -21, 6700, -31, 2860), (9.6165, -18.5, 7000, -26.5, 2700),
               (9.7722, -24.5, 6560, -44, 2230)]
    # still air in the room: f/Hz [Hz], relative level/dB [dB]
    air_spectrum = [(20, -14.5), (45, -12), (65, 8), (120, 2.5), (300, -9.5), (1000, -22.5), (4000, -15),
                    (14000, -14)]
    port_lead_ms = 0.29
    t = np.arange(N) / SR
    fizz_db, rumble_db, tearing = effort()
    source = paper(fizz_db, rumble_db, tearing) + snaps(creases) + thumps() + tear_bursts() + landing()
    source = source + snaps(lesser_snaps(fizz_db, rumble_db, tearing))
    wet = room(source)
    delayed = np.interp(t - port_lead_ms / 1000, t, source)
    left = gain_of(-3.5) * delayed + gain_of(2.0) * wet[0]
    right = source + gain_of(-0.26) * wet[1]
    shared = rng.standard_normal(N)  # the part of the air noise common to both ports
    air = [evened(coloured(shared + 0.58 * rng.standard_normal(N), air_spectrum)) for port in range(2)]
    return np.array([left, right]) + gain_of(-55.5) * np.array(air)


def record(dry):
    """Port resonance and gain reduction: each port has its own quick limiter, then a band limit."""
    # left port, hollow and dull: f/Hz [Hz], level/dB [dB]
    left_port = [(100, -2), (170, 5.5), (300, 3), (460, 4), (610, 10.5), (780, 3.5), (1000, 1), (2000, 0.5),
                 (3000, -6), (4000, -7), (5500, -7.5), (7000, -13.5), (10000, -16.5), (14000, -31)]
    # right port, bright: f/Hz [Hz], level/dB [dB]
    right_port = [(100, 0), (450, -1), (600, -2.5), (800, .5), (2000, .5), (4000, 1), (5000, 3.5),
                  (5800, 8), (6500, 12), (7000, 12.3), (7600, 9.5), (8500, 6), (10000, 3), (14000, 2)]
    edge_hz = 14700
    heard = np.array([coloured(dry[0], left_port), coloured(dry[1], right_port)])
    over_db = np.maximum(20 * np.log10(abs(heard) + 1e-9), 0)
    recovery = np.arange(N) / SR * 500  # dB, growing by 500 a second
    held_db = np.maximum.accumulate(over_db + recovery, axis=1) - recovery
    limited = np.clip(heard / gain_of(smoothed(held_db, 0.00048)), -1, 1)
    low_pass = signal.firwin(301, edge_hz, window=("kaiser", 7), fs=SR)
    return signal.oaconvolve(limited, low_pass[None], "same", axes=1)


dry = scene()
out = record(dry)
inscribe(out)
```